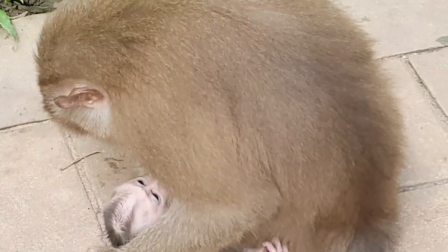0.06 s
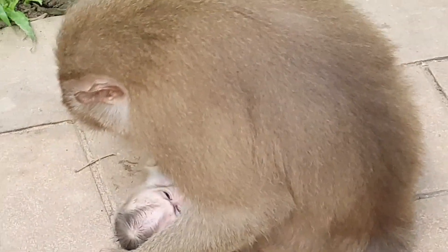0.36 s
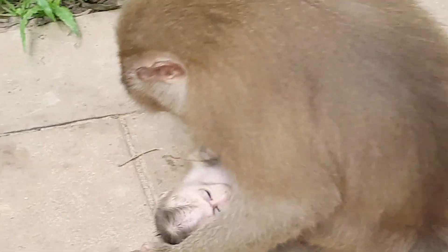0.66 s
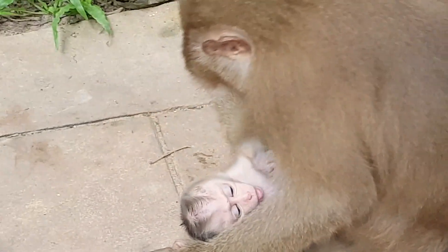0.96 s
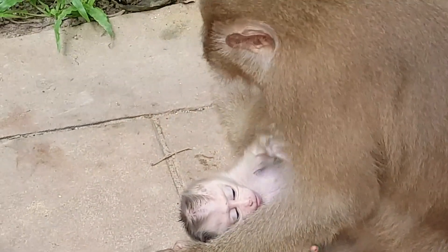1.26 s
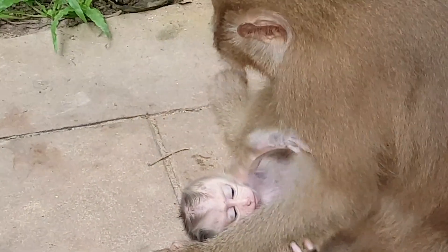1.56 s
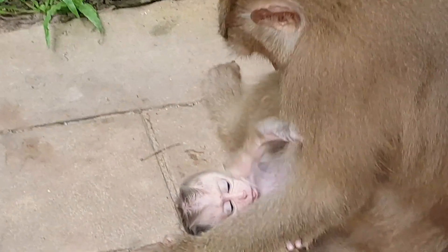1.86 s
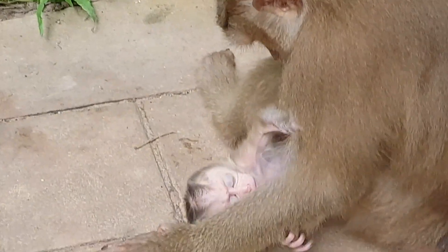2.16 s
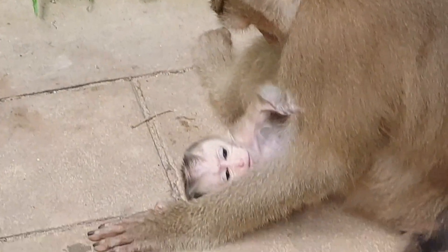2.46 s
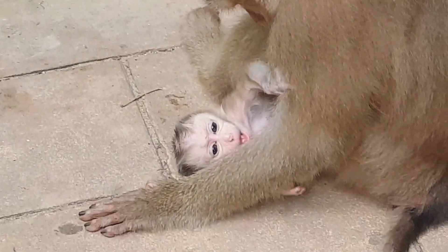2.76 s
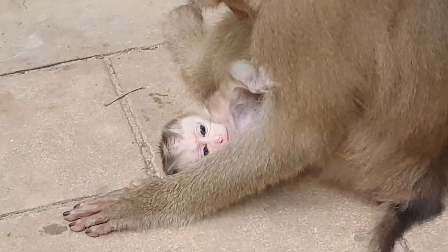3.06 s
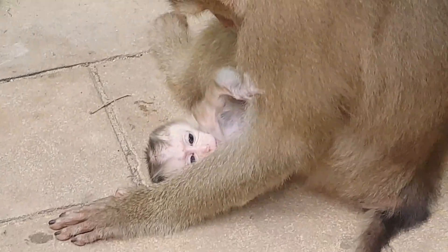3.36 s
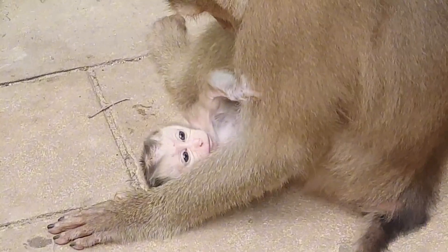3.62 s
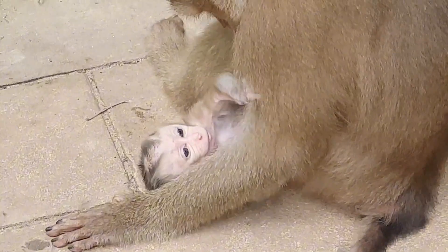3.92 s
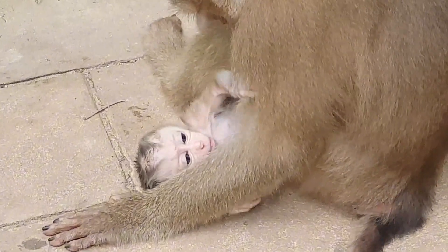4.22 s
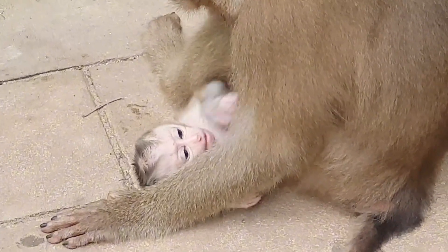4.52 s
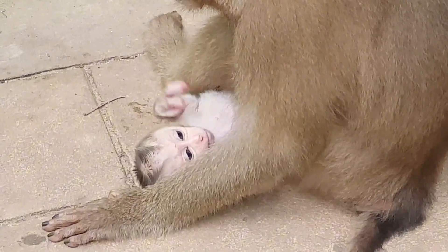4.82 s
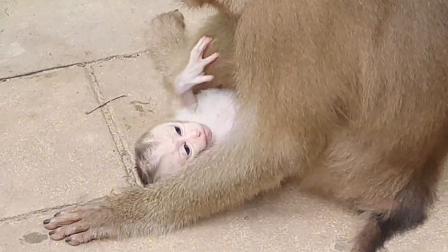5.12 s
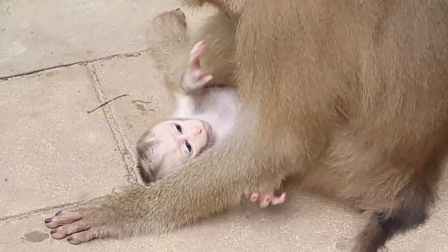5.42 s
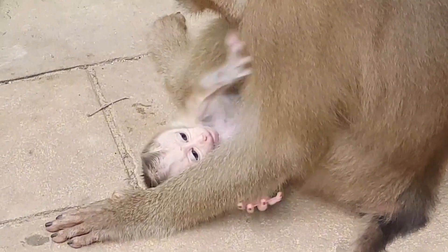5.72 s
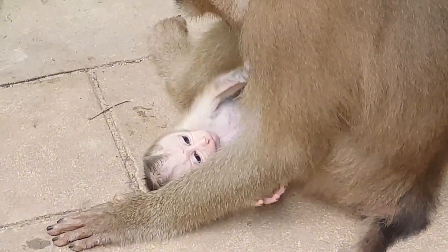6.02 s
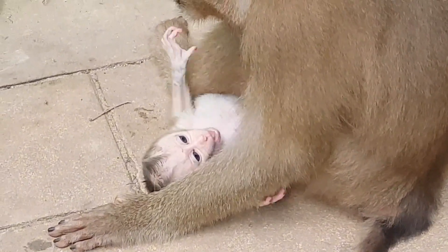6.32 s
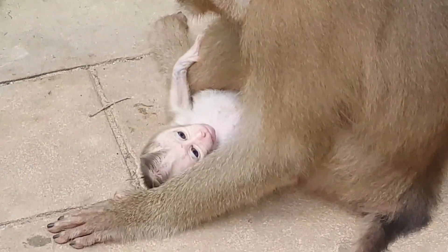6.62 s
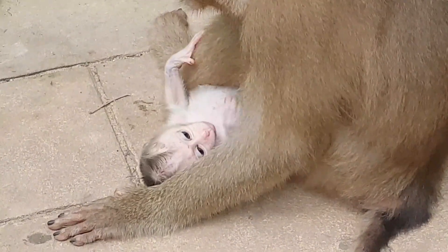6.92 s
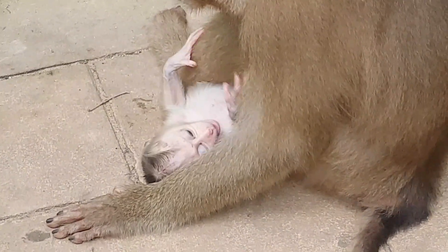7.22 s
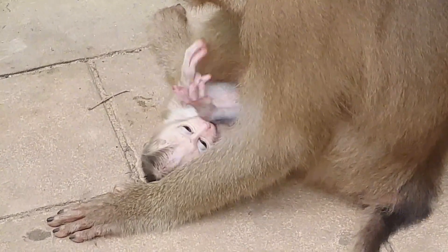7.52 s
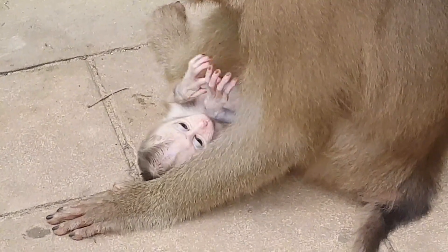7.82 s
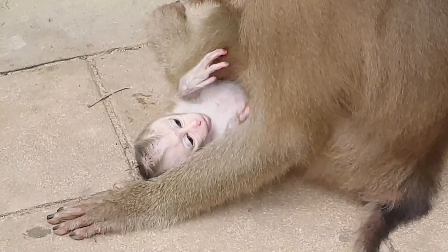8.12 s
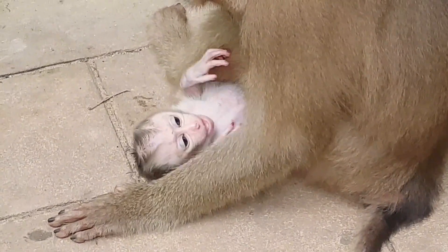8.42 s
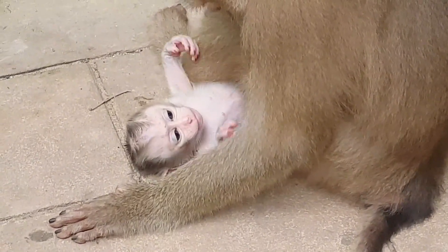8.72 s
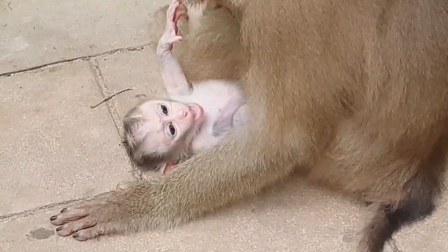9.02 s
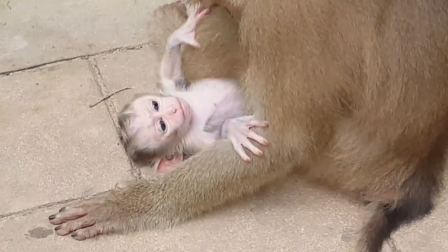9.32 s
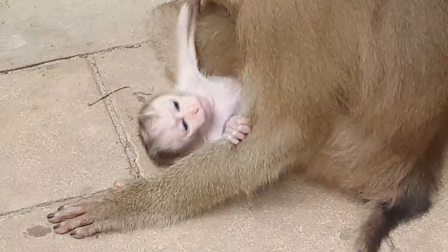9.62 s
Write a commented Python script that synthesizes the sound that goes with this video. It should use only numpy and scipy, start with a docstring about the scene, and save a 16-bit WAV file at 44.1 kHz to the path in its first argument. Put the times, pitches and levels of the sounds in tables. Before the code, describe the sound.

A baby monkey cries in a paved yard, a little to the right, each short call echoing briefly off hard walls. From the start until about 3 seconds the cries come thick and fast: loud, high, arching squeals near 0.3, 1, 1.8 and 2.9 seconds fray into rasps, with hoarse downward swoops at about 1.5 and 2.4. From 3.2 seconds, lower whines, each followed by a rough catch, return roughly once a second, alternating with raspy yelps and a few rising squeaks. The crying stops at about 9.2 seconds. Wind rumbles on the microphone throughout, under a thin high hiss. Soft bumps and a scuff of fur come around 2 seconds, a tiny dry rustle at 3, and small taps at 4.2 and 5.8. Three very faint high whistles sound near 2.5, 5 and 9 seconds.

```python
"""Baby monkey crying in a yard

Held down by an adult on a paved yard, a baby monkey cries: arched squeals, then yelps that break into
rasps, answered by lower whines. Each cry is vocal-fold partials and breath shaped by the throat; it comes
from the right and rings between hard walls. Wind rumbles on the microphone under a thin high hiss, with
soft bumps, a scuff, a rustle, two taps and three faint high whistles."""
import sys
import numpy as np
from scipy import signal
from scipy.fft import rfft, irfft
from scipy.io import wavfile

SR = 44100
rng = np.random.default_rng(int(sys.argv[2]) if len(sys.argv) > 2 else 0)


def store_pcm(level_fs):
    """Save levels as 16-bit WAV."""
    pcm = np.round(np.clip(level_fs, -1, 1) * 32767).astype(np.int16)
    wavfile.write(sys.argv[1], SR, np.atleast_2d(pcm).T)


N = 435266
TIME = np.arange(N) / SR
BINS_HZ = np.fft.rfftfreq(N, 1 / SR)

# throat response of whines and sobs (frequency [Hz], gain [dB])
WHINE_SOB_THROAT = [(720,-23),(1450,-8),(2200,1),(2950,-3),(3650,-6.5),(4400,-9),(5150,-12),(5900,-15.5),(7500,-24),(9000,-27.5),(11000,-18)]


def from_db(db):
    """Decibels to gain."""
    return 10 ** (np.asarray(db) / 20)


def rms_one(x):
    """Scale to unit rms."""
    return x / np.sqrt(np.mean(x ** 2) + 1e-20)


def in_time(points):
    """Read a curve at every sample."""
    return np.interp(TIME, *np.transpose(points))


def at_hz(points, hz):
    """Read a spectrum on a log-frequency axis."""
    f, value = np.transpose(points)
    return np.interp(np.log(np.maximum(hz, 1)), np.log(f), value)


def drift(rate_hz, size):
    """Smooth random wander, unit rms."""
    pole = np.exp(-2 * np.pi * rate_hz / SR)
    white = rng.standard_normal(size + SR // 10)
    return rms_one(signal.lfilter([1], [1, -2 * pole, pole ** 2], white)[-size:])


def noise(colour, size=N):
    """Coloured noise, unit rms."""
    hz = np.fft.rfftfreq(size, 1 / SR)
    return rms_one(irfft(rfft(rng.standard_normal(size)) * from_db(at_hz(colour, hz)), size))


def stereo_noise(colour, side_db):
    """Mid noise plus independent side noise."""
    return noise(colour) + from_db(side_db) * noise(colour) * np.array([[1], [-1]])


def place(x, balance):
    """Pan each frequency at constant power."""
    tilt = from_db(at_hz(balance, BINS_HZ) * np.array([[.5], [-.5]]))
    return irfft(rfft(x) * tilt / np.sqrt(np.mean(tilt ** 2, axis=0)), N)


def wind(level_db=-41, gust_db=1.13, gust_hz=1.66):
    """Gusty rumble on the microphone; the deepest buffets differ between its two ports."""
    # rumble and buffet spectra (frequency [Hz], level [dB])
    colour = [(12, -46), (20, -44), (46, -3.5), (97, 2), (145, -5.5), (209, -19.5), (426, -33), (600, -37),
              (780, -38.5), (1320, -120)]
    buffet_colour = [(15, -18), (35, 3), (55, -2.5), (110, -4.5), (200, -19), (500, -34.5), (1200, -76)]
    buffets = from_db(-12) * noise(buffet_colour) * np.array([[1], [-1]])
    gusts = from_db(level_db + gust_db * drift(gust_hz, N))
    return gusts * (noise(colour) + buffets) * from_db([[-.4], [.3]])


def open_air():
    """Far, steady murmur."""
    # spectrum (frequency [Hz], level [dB])
    colour = [(200,6),(400,-1),(700,-6),(1100,-1.5),(1650,0.5),(2100,1),(3000,-6.5),(4200,-8.5),(6000,-9),(8000,-17),(10000,-45)]
    # pan (frequency [Hz], left minus right [dB])
    balance = [(300,-23),(900,-6),(1500,-5.5),(2100,-17.5),(4500,-11),(6000,-18),(7200,-24),(9000,-5)]
    return from_db(-59.5) * place(stereo_noise(colour, side_db=2), balance)


def hiss(echo_s=.004118, echo_db=-11.5):
    """Top-octave hiss, comb-filtered by a close reflection."""
    # spectrum (frequency [Hz], level [dB])
    colour = [(8000,-32),(8800,-13),(9900,-10.5),(11000,-3.5),(11700,-1.5),(12300,0.5),(13200,-3),(14400,-9.5),(15500,-23.5)]
    # pan (frequency [Hz], left minus right [dB])
    balance = [(8000,-13),(8800,-1),(10700,-2.5),(11500,-3.5),(12300,-10),(13500,-17.5),(15500,-10)]
    direct = from_db(-54.5) * place(stereo_noise(colour, side_db=-.1), balance)
    reflection = from_db(echo_db) * np.exp(-2j * np.pi * BINS_HZ * echo_s)
    return irfft(rfft(direct) / (1 - reflection), N)


def gesture_curves(t, length_s, hz, scoop, settle_s, glide_per_s, droop, attack_s, open_s,
                   low_swell_db, high_swell_db, droop_s=.0201):
    """A cry's pitch scoops in, glides and droops; the voice builds, the opening mouth frees the highs."""
    age, progress = np.maximum(t, 0), np.linspace(-.5, .5, len(t))
    entry = 1 + scoop * np.exp(-(age / settle_s) ** 2)
    ending = 1 - droop * np.exp(np.minimum(t - length_s, 0) / droop_s)
    pitch = hz * entry * (1 + glide_per_s * age) * ending
    voice = 1 - np.exp(-(t - t[0]) / attack_s)
    mouth = 1 - np.exp(-age / open_s)
    return pitch, voice * from_db(low_swell_db * progress), voice * mouth * from_db(high_swell_db * progress)


def cry(row, gesture, throat, jitter, flutter_hz, air_db, shimmer_db=4, fray_db=0, growl=0,
        register_hz=2500, fade_s=.012, waver=.00354, waver_hz=20.3, wobble_hz=15):
    """Partials of unsteady vocal folds plus breath, both coloured by the throat."""
    start_s, length_s, hz, low_db, high_db = row
    span = np.flatnonzero((TIME > start_s - fade_s) & (TIME < start_s + length_s + fade_s))
    t, size = TIME[span] - start_s, len(span)
    pitch, low_swell, high_swell = gesture_curves(t, length_s, hz, **gesture)
    fray = from_db(fray_db * np.linspace(-.5, .5, size))   # roughness follows strain
    unsteady = 1 + jitter * fray * drift(flutter_hz, size) + waver * drift(waver_hz, size)
    phase = 2 * np.pi * np.cumsum(pitch * unsteady) / SR
    order = np.arange(1, 14)[:, None]
    response = from_db(at_hz(throat, order * pitch))
    # effort shifts energy between low and high partials
    high = np.clip((order * pitch - register_hz) / 400 + .5, 0, 1)
    registers = ((from_db(low_db) * low_swell, response * (1 - high)),
                 (from_db(high_db) * high_swell, response * high))
    gains = sum(level * part / np.sqrt(np.sum(part ** 2, axis=0) + 1e-4) for level, part in registers)
    # hoarseness: each partial swells and fades on its own
    shimmer = rms_one(from_db(shimmer_db * np.array([drift(20, size) for _ in order])))
    tone = np.sum(gains * shimmer * np.sin(order * phase), axis=0)
    # a forced voice adds lines between the partials
    thirds = np.array([[4], [8], [10]]) / 3
    wobble = np.cumsum(drift(flutter_hz, size)) * 2 * np.pi * wobble_hz / SR
    lines = from_db(at_hz(throat, thirds * pitch)) * np.sin(thirds * (phase + wobble))
    tone += growl * fray * gains[3] * np.sum(lines, axis=0)
    air_gain = from_db(air_db) * fray * np.sqrt(np.sum(gains ** 2, axis=0))
    air = air_gain * noise(throat, size) * (1 + .5 * np.cos(phase))
    gate = np.clip((np.minimum(t, length_s - t) + fade_s) / (2 * fade_s), 0, 1)
    out = np.zeros(N)
    out[span] = (tone + air) * gate
    return out


def wails():
    """Bright cries of steady pitch."""
    # (start [s], length [s], pitch [Hz], low partials [dB], high partials [dB])
    calls = [(0, 0.048, 803, -76, -53), (.54, 0.084, 722, -55.5, -50), (1.65, 0.13, 743, -61, -49.5),
             (2.659, 0.12, 745.6, -56, -49), (5.59, 0.15, 753, -60.5, -49), (6.365, 0.09, 752, -56.5, -47)]
    # throat response (frequency [Hz], gain [dB])
    throat = [(740,-39),(1480,-11),(2250,-14),(2980,10.5),(3700,-14),(4450,0),(5200,-11),(5950,0),(6700,-24),(7500,-7.5),(9000,-31),(11000,-33)]
    gesture = dict(scoop=-0.0401, settle_s=0.02045, glide_per_s=-0.032, droop=0.004, attack_s=0.0031, open_s=.008, low_swell_db=-20, high_swell_db=-10)
    return sum(cry(c, gesture, throat, jitter=.0098, flutter_hz=120, air_db=-7.5) for c in calls)


def echoes(x, onset_s=.0066, early_db=3.5, early_s=.013):
    """Near walls: strong early echoes, then a dense stereo tail dying band by band."""
    # yard decay (frequency [Hz], T60 [s])
    t60 = [(500,0.12),(2000,0.86),(4000,1),(6000,1),(10000,0.38)]
    t, tail = TIME[:SR], 0
    edges_hz = np.geomspace(300, 15000, 9)
    for low, high in zip(edges_hz, edges_hz[1:]):
        bandpass = signal.butter(2, [low, high], "band", fs=SR, output="sos")
        band = signal.sosfilt(bandpass, rng.standard_normal((2, SR)))
        tail += band * np.exp(-np.log(1000) * t / at_hz(t60, np.sqrt(low * high)))
    tail *= (1 - np.exp(-t / onset_s)) * from_db(early_db * np.exp(-t / early_s))
    return signal.fftconvolve(x[None], rms_one(tail) / np.sqrt(SR), axes=1)[:, :N]


def yelps():
    """Short, hoarse, falling cries."""
    # (start [s], length [s], pitch [Hz], low partials [dB], high partials [dB])
    calls = [(.18, .07, 844, -51, -54), (3.595, 0.11, 1124, -44.5, -49.5), (5.47, .11, 1048, -49, -47.5),
             (6.25, 0.073, 933, -50, -48.5), (7.02, 0.088, 958, -51, -48.5),
             (7.79, .11, 1010, -48.5, -47.5), (8.58, 0.11, 1015, -49.5, -47.5)]
    # throat response (frequency [Hz], gain [dB])
    throat = [(950,-7),(1200,-2),(1900,9),(3000,1.5),(4000,-5),(5000,-12.5),(6000,-11),(7000,-20.5),(9000,-24),(12000,-46)]
    gesture = dict(scoop=-.03, settle_s=0.0185, glide_per_s=-0.168, droop=0.0805, attack_s=.012, open_s=0.012, low_swell_db=-2, high_swell_db=5)
    return sum(cry(c, gesture, throat, jitter=.012, flutter_hz=178, air_db=-14.5, fray_db=-.5)
               for c in calls)


def squeals():
    """Loud arches that start clean and fray as they fall; the folds slip into a slower cycle."""
    # (start [s], length [s], pitch [Hz], low partials [dB], high partials [dB])
    calls = [(.268, .178, 1011, -52.5, -41), (0.993, .185, 1014, -49, -39.5),
             (1.828, .19, 1005, -49.5, -39.5), (2.878, 0.17, 1003, -48.5, -40)]
    # throat response (frequency [Hz], gain [dB])
    throat = [(1030,-27),(1250,-3),(1800,-2),(2800,-4),(3300,-2.5),(3550,2.5),(3950,4.5),(4600,-20),(5700,-11.5),(6600,-17),(7500,-18),(9500,-22),(12000,-24)]
    gesture = dict(scoop=-.16, settle_s=.022, glide_per_s=-.72, droop=0.0246, attack_s=0.0086, open_s=0.012, low_swell_db=-2.5, high_swell_db=-5.5)
    return sum(cry(c, gesture, throat, jitter=.0035, flutter_hz=300, air_db=-13, shimmer_db=2.5,
                   fray_db=10, growl=from_db(-13)) for c in calls)


def rasps():
    """Rough, breathy voice into which a squeal or yelp breaks."""
    # (start [s], length [s], pitch [Hz], low partials [dB], high partials [dB])
    calls = [(.39, 0.079, 872, -58, -49), (.962, 0.046, 820, -55, -54), (1.1, 0.13, 865, -57, -52),
             (1.275, 0.058, 837, -57, -47.5), (2.06, 0.095, 812, -51.5, -49),
             (2.9, 0.209, 789, -55.5, -48.5), (3.7, 0.083, 745, -53.5, -45.5),
             (4.84, 0.12, 773, -51, -48.5), (5.57, 0.12, 748, -56, -54), (6.37, 0.087, 734, -53, -51),
             (7.11, 0.11, 724.5, -57, -47), (7.9, 0.12, 725, -55, -47.5), (8.68, 0.092, 740.5, -53, -46)]
    # throat response (frequency [Hz], gain [dB])
    throat = [(750,-16.5),(1500,2.5),(2200,1),(2950,6.5),(3600,-4.5),(4400,-5),(5100,-12),(5900,-7.5),(6900,-18),(9000,-19),(12000,-20)]
    gesture = dict(scoop=0.0094, settle_s=0.019, glide_per_s=-0.046, droop=.01, attack_s=.004, open_s=0.013, low_swell_db=-9, high_swell_db=-5.5)
    return sum(cry(c, gesture, throat, jitter=.0256, flutter_hz=138, air_db=-5.5) for c in calls)


def mews():
    """Hoarse cries of nearly level pitch."""
    # (start [s], length [s], pitch [Hz], low partials [dB], high partials [dB])
    calls = [(.772, 0.085, 905.6, -50, -46.5), (1.268, .055, 880, -51, -58.5), (4.325, 0.13, 900, -48, -47)]
    # throat response (frequency [Hz], gain [dB])
    throat = [(900,-30),(1400,0),(1800,-3),(2200,-2),(2700,-16),(3550,8),(4400,-10),(5300,-8),(6300,-9.5),(7500,-20),(12000,-21)]
    gesture = dict(scoop=-.07, settle_s=0.0116, glide_per_s=-.25, droop=.06, attack_s=0.005, open_s=0.0055, low_swell_db=-7, high_swell_db=-1)
    return sum(cry(c, gesture, throat, jitter=.011, flutter_hz=200, air_db=-10.5, fray_db=4.5)
               for c in calls)


def howls():
    """Hoarse cries swooping down from high up."""
    # (start [s], length [s], pitch [Hz], low partials [dB], high partials [dB])
    calls = [(1.465, 0.19, 985, -46, -49.5), (2.445, 0.2, 945.4, -45.5, -48)]
    # throat response (frequency [Hz], gain [dB])
    throat = [(900,-26),(1400,-13),(1800,1.5),(2200,5.5),(2700,-11),(3100,-4),(3550,6),(4400,-8),(5300,-7),(6300,-13),(7500,-15.5),(12000,-27)]
    gesture = dict(scoop=.36, settle_s=.033, glide_per_s=-.42, droop=.005, attack_s=.03, open_s=.012, low_swell_db=-3, high_swell_db=1)
    return sum(cry(c, gesture, throat, jitter=.0171, flutter_hz=198, air_db=-9.5, fray_db=-2,
                   register_hz=3080) for c in calls)


def knocks(contacts, modes):
    """Each contact rings a few quickly damped modes."""
    clicks, t = np.zeros(N), TIME[:SR // 10]
    for time_s, db in contacts:
        clicks[round(time_s * SR)] = from_db(db)
    ring = sum(from_db(db) * np.sin(2 * np.pi * hz * t) * np.exp(-np.log(1000) * t / t60_s)
               for hz, db, t60_s in modes)
    return signal.fftconvolve(clicks, ring)[:N]


def bumps(cutoff_hz=700):
    """Soft, low knocks against the microphone."""
    # (time [s], relative level [dB])
    contacts = [(1.892, -27.5), (2.043, -39), (2.083, -37), (2.135, -34)]
    # resonances (frequency [Hz], gain [dB], T60 [s])
    modes = [(64,-6,0.18),(279,0.5,0.016),(392,-2.5,0.027),(1100,-4,0.0087)]
    lowpass = signal.butter(2, cutoff_hz, fs=SR, output="sos")
    return from_db(2) * signal.sosfilt(lowpass, knocks(contacts, modes))


def scuff():
    """Brief rub of fur."""
    # envelope (time [s], relative level [dB])
    envelope = [(2.02,-46),(2.05,-34),(2.085,-35),(2.11,-35),(2.15,-37.5),(2.18,-78)]
    # spectrum (frequency [Hz], level [dB])
    colour = [(120,20.5),(330,3.5),(600,-6),(1100,-3.5),(2000,-5),(5000,-11),(11000,-15),(15000,-8)]
    return from_db(in_time(envelope) + .43 * drift(84, N)) * stereo_noise(colour, side_db=-8.5)


def squeaks():
    """Rough, rising cries."""
    # (start [s], length [s], pitch [Hz], low partials [dB], high partials [dB])
    calls = [(2.195, 0.1, 628.4, -50.5, -48), (4.48, .11, 718, -54, -49), (4.735, 0.11, 741, -52, -49.5),
             (6.325, 0.054, 691, -51, -55)]
    # throat response (frequency [Hz], gain [dB])
    throat = [(700,-41),(1400,-14),(2100,13),(2700,-5),(3400,-1),(4300,-9.5),(5300,-9.5),(6300,-14.5),(7500,-22),(11000,-34)]
    gesture = dict(scoop=-0.0223, settle_s=0.0208, glide_per_s=2.6, droop=0.0094, attack_s=0.0036, open_s=0.018, low_swell_db=-7, high_swell_db=-1)
    return sum(cry(c, gesture, throat, jitter=.017, flutter_hz=258, air_db=-8.5) for c in calls)


def whistles(jitter=.016, rise=.02):
    """Faint airy tones that swell, rise slightly and fade."""
    # (start [s], length [s], pitch [Hz], level [dB])
    notes = [(2.52, 0.3, 9100, -66), (5.0, 0.28, 9100, -60), (8.946, 0.37, 9000, -60)]
    out = np.zeros(N)
    for start_s, length_s, hz, db in notes:
        span = np.flatnonzero((TIME > start_s) & (TIME < start_s + length_s))
        progress = np.linspace(0, 1, len(span))
        pitch = hz * (1 - rise * (1 - progress) ** 2 + jitter * drift(390, len(span)))
        out[span] += from_db(db) * np.sin(np.pi * progress) * np.sin(2 * np.pi * np.cumsum(pitch) / SR)
    return out


def rustle():
    """Thin, dry, flickering noise."""
    # envelope (time [s], relative level [dB])
    envelope = [(3.03,-85),(3.055,-47),(3.07,-58),(3.09,-49),(3.11,-48),(3.13,-85)]
    # spectrum (frequency [Hz], level [dB])
    colour = [(2000,-30),(5000,1),(8000,-7),(11500,-3),(15500,-20)]
    return from_db(in_time(envelope) + 2.5 * drift(120, N)) * stereo_noise(colour, side_db=4)


def whines():
    """Low, soft, purer cries."""
    # (start [s], length [s], pitch [Hz], low partials [dB], high partials [dB])
    calls = [(3.19, 0.14, 743, -44.5, -50.5), (3.92, 0.135, 743, -44.5, -52.5),
             (5.06, .16, 726, -45.5, -54), (5.835, 0.16, 739.6, -44.5, -54),
             (6.62, 0.13, 731, -44.5, -53.5), (7.38, .14, 710.5, -47.5, -54.5),
             (8.155, 0.1566, 739, -45, -54), (8.925, .17, 733.6, -46, -51.5)]
    gesture = dict(scoop=-.075, settle_s=.035, glide_per_s=-0.028, droop=0.0249, attack_s=0.028, open_s=0.027, low_swell_db=-4.5, high_swell_db=8)
    return sum(cry(c, gesture, WHINE_SOB_THROAT, jitter=.0094, flutter_hz=131, air_db=-12, shimmer_db=5,
                   fray_db=3.5) for c in calls)


def sobs():
    """A short, rough catch after each whine."""
    # (start [s], length [s], pitch [Hz], low partials [dB], high partials [dB])
    calls = [(3.37, 0.048, 735, -51, -52.5), (4.09, .06, 735, -49.5, -54),
             (5.255, 0.045, 734, -49.5, -56.5), (6.015, 0.056, 733, -53, -57.5),
             (6.8, 0.041, 740, -49.5, -51.5), (7.56, 0.051, 730, -50, -56), (8.34, 0.055, 731, -55, -54),
             (9.12, 0.045, 732, -50, -59)]
    gesture = dict(scoop=-0.0503, settle_s=.018, glide_per_s=.1, droop=0.0296, attack_s=.004, open_s=.004, low_swell_db=-6, high_swell_db=-1)
    return sum(cry(c, gesture, WHINE_SOB_THROAT, jitter=.041, flutter_hz=130, air_db=-4.5) for c in calls)


def taps():
    """Small hard contacts with a faint wall echo."""
    # (time [s], relative level [dB])
    contacts = [(4.154, -39), (5.809, -32)]
    # resonances (frequency [Hz], gain [dB], T60 [s])
    modes = [(830,-21,0.024),(1330,-10,0.023),(1800,-2.5,0.018),(2500,-12,.02),(5200,-18,.012)]
    direct = knocks(contacts, modes)
    return direct + from_db(-10) * echoes(direct)


def scene():
    """Cries and echoes to the right, over near sounds and background."""
    # wall reflection (frequency [Hz], gain [dB])
    wall_return = [(800,3.5),(1500,-2.5),(2200,-2.5),(3000,0.5),(3700,1),(4800,7),(5900,9),(7000,6.5),(9000,9)]
    # pan of the cries (frequency [Hz], left minus right [dB])
    balance = [(800,-5.5),(1500,-8),(2100,-12),(3000,-10),(4500,-12),(6000,-17),(7500,-20),(8800,-2),(12000,-5)]
    voice = mews() + howls() + yelps() + whines() + sobs() + wails() + squeaks() + rasps()
    squeal = squeals()
    # a wide-open mouth beams squeals forward: less reaches the walls
    spread = voice + from_db(-2) * squeal
    returned = echoes(irfft(rfft(spread) * from_db(at_hz(wall_return, BINS_HZ)), N))
    cries = place(voice + squeal + from_db(-2.5) * returned, balance)
    calls = cries + whistles()
    near = bumps() + (scuff() + rustle()) * from_db([[-7], [0]]) + taps() * from_db([[-4], [3]])
    return calls + near + wind() + open_air() + hiss()


def record(dry):
    """Steep treble cut."""
    cutoff_hz = 15700
    return signal.sosfilt(signal.ellip(12, .1, 90, cutoff_hz, fs=SR, output="sos"), dry)


dry = scene()
out = record(dry)
store_pcm(out)
```